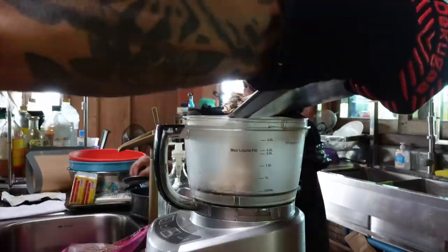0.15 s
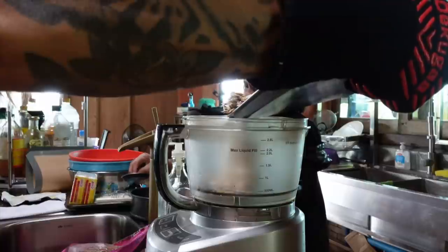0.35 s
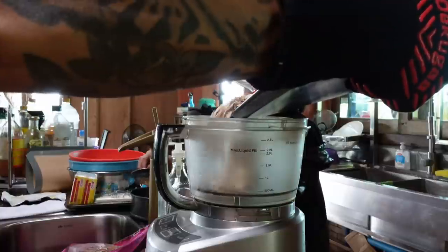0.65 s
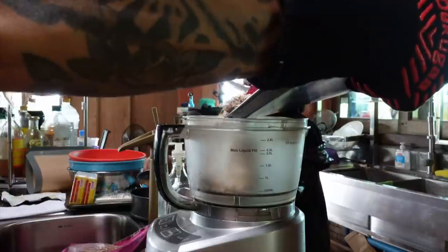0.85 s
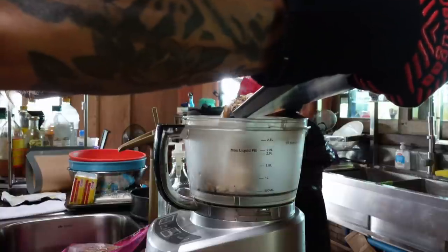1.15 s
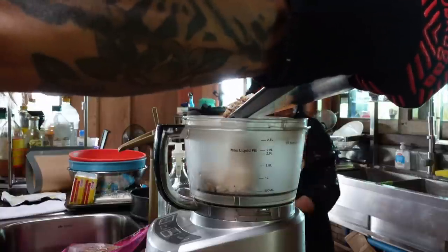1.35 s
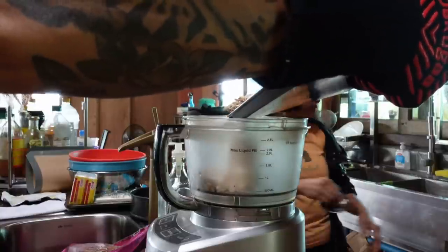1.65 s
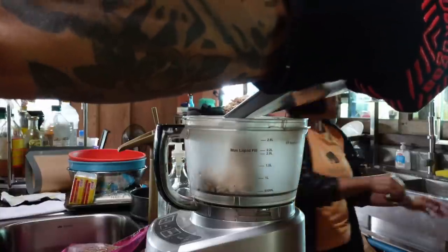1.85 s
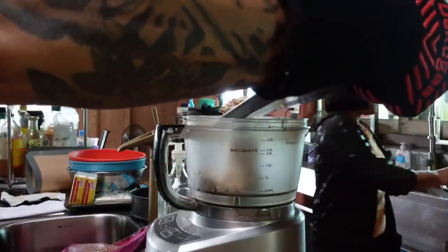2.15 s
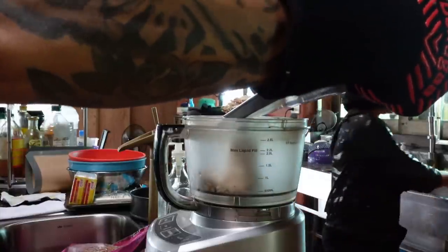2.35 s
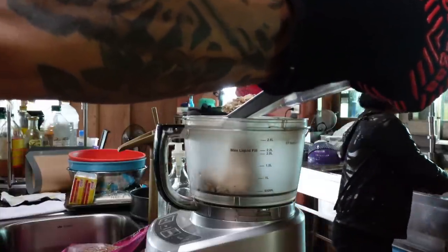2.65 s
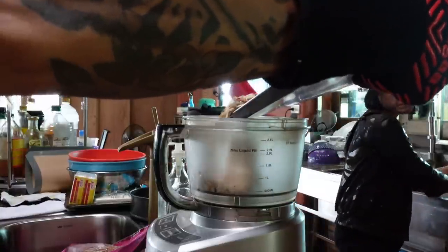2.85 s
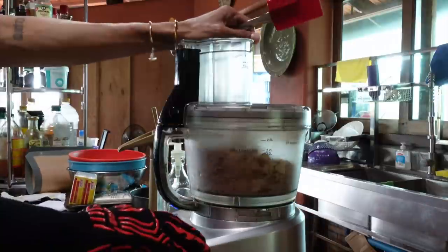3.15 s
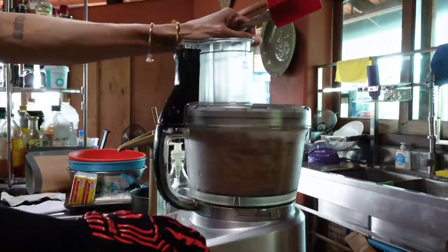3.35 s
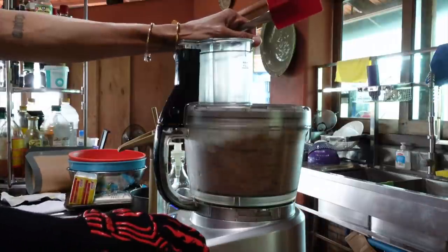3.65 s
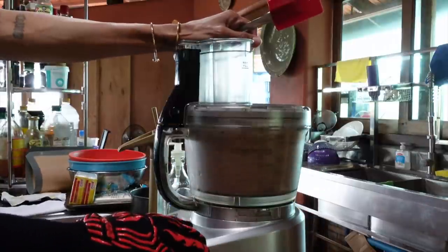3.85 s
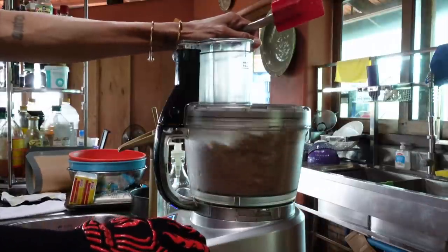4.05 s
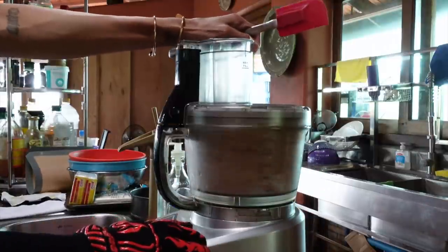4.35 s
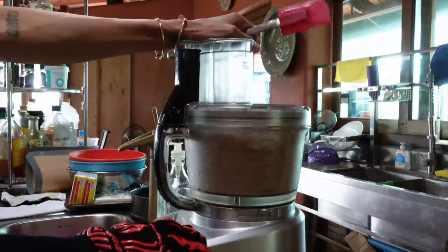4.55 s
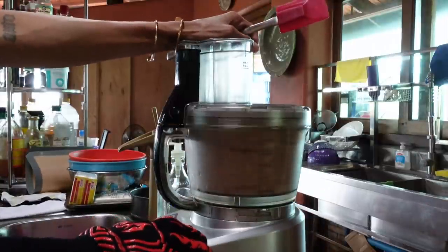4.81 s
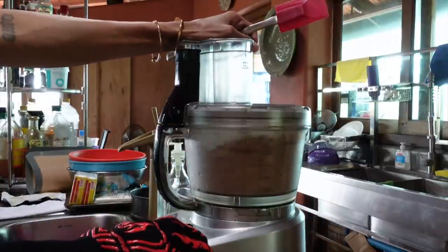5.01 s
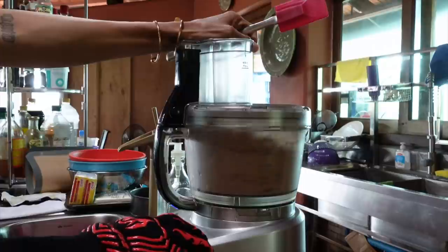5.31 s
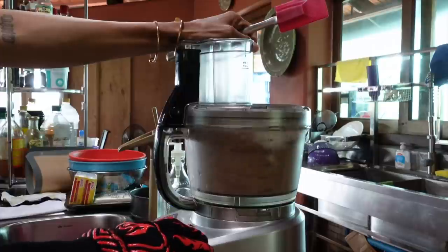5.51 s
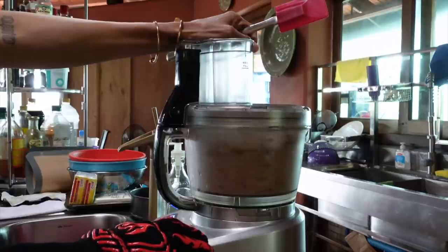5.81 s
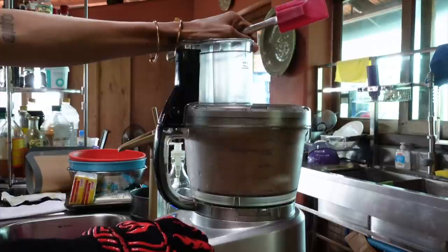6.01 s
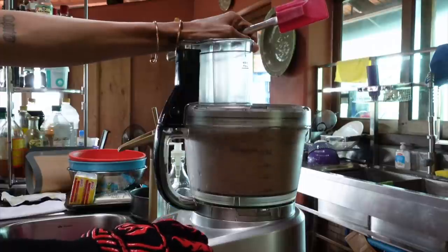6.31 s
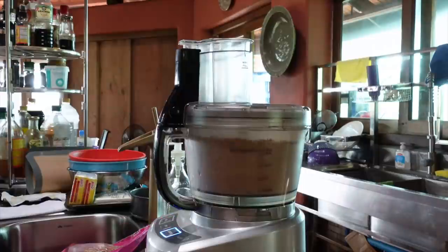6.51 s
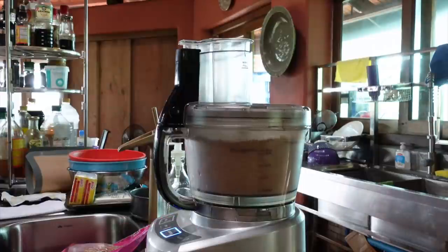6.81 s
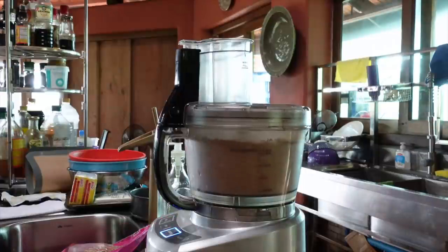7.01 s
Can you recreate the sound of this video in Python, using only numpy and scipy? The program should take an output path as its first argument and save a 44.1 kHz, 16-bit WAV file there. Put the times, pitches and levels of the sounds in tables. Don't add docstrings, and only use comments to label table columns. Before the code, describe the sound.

Close stereo microphones catch a metal tray knocked and ringing in a live kitchen, dry flakes skittering off it, sparse taps, then a gritty spatula stroke. Suddenly a food processor is close by, chopping nuts in six separate bursts, each starting with a hard rattle against the plastic bowl and churning down. Finally it runs continuously, rattling, beating and humming over faint room air.

```python
import sys
import numpy as np
from scipy import signal
from scipy.fft import rfft, irfft
from scipy.io import wavfile
from scipy.ndimage import uniform_filter1d

SR = 44100
rng = np.random.default_rng(int(sys.argv[2]) if len(sys.argv) > 2 else 0)


def digitize_waveform(pressure):
    field = np.atleast_2d(pressure).T
    bounded = np.clip(field, -1, 1)
    quanta = np.round(bounded * 32767).astype(np.int16)
    wavfile.write(sys.argv[1], SR, quanta)


def natural_amplitude(level_db):
    exponent = np.asarray(level_db, float) / 20
    return 10 ** exponent


N = 316197
CONTROL_S = np.arange(N // 44 + 2) * 44 / SR
CUT_S, RUN_S = 3.09, 6.45
SHAFT_HZ, TRAY_HUM_HZ = 29.2, 1180
RATTLE_REF_DB = -26

# freq_hz, density_db (per Hz)
RATTLE_SPECTRUM = [(350, -37), (600, -11.5), (744, -10), (853, -11), (955, -5.5), (1160, 0.5), (1280, -8),
                   (1520, -2.5), (1700, -4), (2210, -1.5), (3510, -5.5), (3980, -8.5), (5110, -6.5),
                   (9000, -28.5), (11700, -49), (19800, -120)]
CRACKLE_SPECTRUM = [(3820, -33), (6500, -4.5), (6970, -0.5), (7470, -3), (10700, -10.5), (14400, -20.5),
                    (15600, -9)]
RUMBLE_SPECTRUM = [(18, -74.5), (30, -49), (81, -29), (108, -13.5), (200, 0), (263, -5.5), (381, 1),
                   (488, -4), (530, -10), (800, -2.5), (1040, -39), (1760, -120)]
# freq_hz, width_hz, level_db
BOWL_LOW = [(871, 57, -2), (800, 70, -12.5)]
BOWL_HIGH = [(1085, 97, 1.5), (1530, 37, -11), (2200, 66, 9), (2530, 82, 3), (3305, 81, 10),
             (4730, 83, -12), (7100, 160, -40)]
# freq_hz, rms_db
SHAFT_ORDERS = [(120, -57), (177, -51), (208, -45), (239.5, -50), (268.5, -52), (479.8, -46), (1187, -45)]
# freq_hz, rms_db
MOTOR_WHINE = [(3190, -46), (4690, -51), (5990, -52), (6840, -53), (11090, -66)]
# time_s, level_db (above 3 kHz)
COARSE = [(3.2, 2.5), (3.8, -2), (4.3, -0.5), (4.9, 1), (5.5, -1), (6.1, 0), (6.8, -0.5)]
# on_s, peak_s, rattle_db, lurch_db
FLINGS = [
    (3.142, 3.239, -23, -45),
    (3.715, 3.777, -25, -54),
    (4.182, 4.275, -21.5, -39),
    (4.747, 4.843, -22, -38),
    (5.307, 5.407, -23, -55),
    (5.906, 5.984, -24, -35),
]
# peak_s, rattle_db, off_s, rumble_db (extra)
CHURNS = [
    (3.409, -27, 3.466, -0.5),
    (3.830, -30.5, 3.94, -0.5),
    (4.401, -27, 4.51, 0),
    (4.985, -25.5, 5.09, -1.5),
    (5.532, -25.5, 5.68, 3),
    (6.070, -26.5, 6.29, -1.5),
]
# time_s, rattle_db, rise_db_per_s, fall_db_per_s
SLAMS = [
    (3.212, -25.5, 3000, 200),
    (4.241, -29, 2000, 250),
    (4.811, -33, 2000, 250),
    (4.917, -31, 1500, 200),
    (5.362, -29.5, 2000, 247.5),
    (5.583, -31, 1500, 213),
    (5.955, -30.5, 2000, 252),
    (6.108, -26, 1500, 140),
]
# time_s, ring_db, rise_db_per_s, fall_db_per_s
JOLTS = [(3.744, -26.5, 1200, 250), (4.219, -28, 897, 202), (4.320, -33, 200, 158.5), (4.699, -52, 150, 61),
         (4.790, -35.5, 700, 150), (4.866, -35.5, 198, 150), (5.344, -38, 898.5, 200),
         (5.420, -26.5, 900, 126), (5.576, -30, 103, 112), (5.889, -47, 152, 65.5), (6.035, -38, 400, 68.5),
         (6.075, -27.5, 147, 500)]
# time_s, base_knock_db, wall_knock_db, wall_pitch_hz
BEATS = [(6.46, -46, -23.5, 990), (6.54, -34, -31, 1000), (6.61, -25, -31, 1130), (6.65, -34, -36, 1120),
         (6.74, -36, -23, 1190), (6.8, -39, -27, 1050), (6.87, -36, -22, 950), (6.91, -24.5, -27, 906),
         (6.98, -24, -38, 980), (7.02, -30.5, -29, 1120), (7.08, -30, -39, 915), (7.16, -42, -23, 1130)]

# peak_s, patter_db, rise_db_per_s, fall_db_per_s
SLIDES = [
    (0.620, -63, 200, 40),
    (0.694, -41, 2997, 501.5),
    (0.750, -45.5, 1500, 100),
    (0.775, -42.5, 400, 81),
    (0.894, -47, 298, 75),
    (1.165, -54, 600, 150),
    (1.212, -47.5, 200, 107),
    (1.330, -61.5, 100, 36),
    (2.260, -63, 300, 247),
    (2.270, -61, 97, 25),
]
# peak_s, level_db, rise_db_per_s, fall_db_per_s
HUMS = [
    (0.648, -59, 600, 500),
    (0.696, -41, 4000, 600),
    (0.762, -40, 600, 150),
    (0.795, -39, 200, 1200),
    (0.892, -52, 500, 250),
    (1.215, -55, 400, 120),
]
# peak_s, level_db, rise_db_per_s, fall_db_per_s
HUM_LINGER = (0.835, -51.5, 900, 28)
# freq_hz, density_db (per Hz)
PATTER_SPECTRUM = [(710, -45), (1200, -3), (1390, -11), (1540, -6), (1730, -20), (1940, -4.5), (3080, -12),
                   (3690, -9), (4070, -12), (10300, -29), (15500, -47)]

# time_s, pressure_db
SCRAPE = [
    (2.63, -103),
    (2.646, -50),
    (2.66, -38.5),
    (2.762, -37),
    (2.822, -46),
    (2.864, -44.5),
    (3.018, -53),
    (3.062, -58.5),
    (3.1, -72),
]
# time_s, grit_db, rise_db_per_s, fall_db_per_s
CRUMBS = [
    (2.66, -41.5, 1800, 190),
    (2.730, -52, 122, 200),
    (2.780, -50, 800, 198),
    (2.890, -50.5, 1500, 46),
    (2.955, -55, 500, 60),
    (3.060, -52.5, 250, 500),
]
# peak_s, level_db, rise_db_per_s, fall_db_per_s
SQUEALS = [
    (2.89, -57, 2000, 60),
    (2.956, -66, 1500, 50),
]
# freq_hz, width_hz, level_db
SQUEAL_MODES = [(3780, 90, 0), (3470, 120, -4), (2480, 110, -6)]
# peak_s, level_db, rise_db_per_s, fall_db_per_s
DUST = (2.975, -69, 250, 30)
# freq_hz, density_db (per Hz)
DRAG_SPECTRUM = [(59, -45), (100, -22.5), (219, -10.5), (404, -9.5), (461, 3.5), (541, -6), (735, 0),
                 (851, -5), (1250, -3), (2070, -8), (2400, -17), (3120, -50), (5280, -120)]
GRIT_SPECTRUM = [(880, -19), (1500, -6), (2090, -2), (3120, -3.5), (3540, -0.5), (4270, -7.5), (9790, -24),
                 (15500, -56)]

# time_s, peak_db, tilt_db_per_octave, ring_db, room_db
BLOWS = [
    (0.071, -44.5, -2.5, -7, -6),
    (0.149, -40, -1, -5, -2.5),
    (0.193, -18, -1, -6, -2.5),
    (0.543, -41.5, 2.5, -17, -8.5),
    (0.693, -50, -2, -26, 2.5),
]
# time_s, peak_db, pitch_hz, tilt_db_per_octave, ring_db
TAPS = [(.693, -50, 1180, -1, 4), (0.693, -40, 2620, -4, 10), (0.072, -49, 2170, -4, 6),
        (1.699, -42, 567, -5, -8), (1.701, -50.5, 1800, -3, 5), (1.7, -43, 1268, -4, -1),
        (1.94, -63.5, 1700, 3, 10), (1.966, -64, 1190, -5, 6), (2.165, -58, 340, -17, -2),
        (2.258, -44, 2200, -6, 7.5), (2.654, -28.5, 1230, -5, -27), (2.886, -48, 3770, -6, 8),
        (2.954, -43.5, 2220, 8, 12)]
# time_s, peak_db, ring_db
CLUNKS = [
    (3.143, -34, -2),
    (3.729, -25.5, -15),
    (3.74, -30.5, 13),
    (4.162, -37, -24),
    (4.189, -28, -30),
    (4.209, -37, 5),
]
# freq_hz, level_db, t60_s
TRAY = [(351, -20.5, 1.1), (534, -11.5, 1.4), (617, -34, 0.32), (658, -17, 1.97), (826, -11.5, 1.2),
        (913, -6, 0.61), (1184, -12, 0.33), (1450, -16, 0.79), (1770, -8.5, 0.2), (2200, -11, 0.2),
        (2220, -22, 0.3), (2670, -11, 0.3), (3170, -17, 0.6), (3320, -10, 0.66), (3500, -27, 0.95),
        (3750, -6, 0.38), (4500, -33, 0.33), (5300, -28, 1), (5150, -12, 0.56), (5766, -37, 0.43)]
RIM = [(1160, -5, 1.5), (1432, -39, 5.0), (1800, -4, 1.6), (2060, -2, 0.43), (2218, 3, 0.43),
       (2630, -13, 0.75), (3149, -3, 0.59), (3300, -13, 0.96), (3360, -12, 5.0), (3618, -9, 0.67),
       (3779, -19, 5.0), (3840, -14, 2.3), (4081, -19, 0.86), (4300, -14, 0.32)]
# freq_hz, density_db (per Hz)
KNOCK_SPECTRUM = [(59, -67.5), (100, -24), (487, -5), (519, -7), (1020, -5), (1760, -2), (2470, -11.5),
                  (3250, -6), (8410, -19), (15500, -43)]
# freq_hz, t60_s
KITCHEN = [(200, 0.89), (600, 0.94), (1500, 0.69), (4000, 0.8), (10000, 0.7)]
# freq_hz, density_db (per Hz)
CLATTER_SPECTRUM = [(47, -43), (80, -5), (385, 3), (428, -3), (611, 0), (1410, -15.5), (1570, -12),
                    (3870, -21), (12000, -50), (15600, -77.5), (22000, -120)]

# freq_hz, density_db (per Hz)
AIR_SPECTRUM = [(15, -53), (25, -21.5), (53, -5), (86, -23), (107, -5.5), (204, -2), (253, -9.5),
                (281, -11.5), (684, -15.5), (2560, -16.5), (3630, -16), (7700, -24), (10100, -34),
                (15500, -55.5)]
# time_s, level_db
AIR_LEVEL = [
    (0, 7.5),
    (3.085, 4),
    (3.1, 10),
    (7.2, 14),
]
# freq_hz, width_hz, level_db
FAN_HISS = [(9800, 760, 7), (3580, 300, 1)]

# freq_hz, side_db (above mid)
PROCESSOR_WIDE = [(60, -39), (110, -46), (200, -61), (380, -22), (700, -20), (1290, -19), (2380, -14),
                  (4400, -18), (8120, -13), (15000, 2.5)]
TRAY_WIDE = [(60, -18), (150, -26), (380, -17.5), (950, -9.5), (2380, -7.5), (5980, -4.5), (15000, -3)]
AIR_WIDE = [(60, -24), (150, -17), (380, -3), (950, -1.5), (2380, -1), (5980, -2), (15000, -3)]
# freq_hz, level_db
PROCESSOR_LEAN = [(60, 0.0), (130, 0.32), (290, -0.2), (640, -0.31), (1410, -0.37), (3100, -1.5),
                  (6820, -2.0), (15000, -1.5)]
TRAY_LEAN = [(60, 3), (180, -1.5), (550, 0), (1650, -2), (4970, -3.5), (15000, -3.5)]


def processor():
    rattle_db, ring_db, rumble_db, crackle_db = chopping()
    t = np.arange(N) / SR
    load = natural_amplitude(0.7 * slow(span=500) + 0.6 * np.cos(2 * np.pi * SHAFT_HZ * t))
    hits = near_echo(load * impacts(3500, spread_db=1.5), wet_db=0.0, t60=0.96)
    thumps = near_echo(load * impacts(900, spread_db=2.5), wet_db=-1.0, t60=0.098)
    modes = sum(natural_amplitude(db + 4.5 * slow(span=2500)) * rung(hits, [(hz, width, 0)]) for hz, width, db in BOWL_HIGH)
    wall = coloured(hits, RATTLE_SPECTRUM) + natural_amplitude(-15) * evened(modes)
    coarse_gain = natural_amplitude(np.interp(t, *np.transpose(COARSE)))
    wall = clumped(wall + (coarse_gain - 1) * filtered(wall, 2, 3000, "high"))
    slots = tone(BOWL_LOW[0][0] + 14 * slow(span=900))
    ring = rung(hits + 1.9 * thumps, BOWL_LOW) + 0.7 * slots
    layers = natural_amplitude(rattle_db) * evened(wall) + natural_amplitude(ring_db) * evened(ring)
    layers += natural_amplitude(rumble_db) * coloured(thumps, RUMBLE_SPECTRUM)
    layers += natural_amplitude(crackle_db) * coloured(hits, CRACKLE_SPECTRUM)
    thud = natural_amplitude(-40.5) * np.exp(-((t - RUN_S) / 0.0025) ** 2)
    return layers + thud + beats() + motor_hum() * (t > RUN_S)


def chopping():
    flings, churns = [], []
    for (on, s, db, _), (churn_s, churn_db, off, _) in zip(FLINGS, CHURNS):
        spin_up = np.clip((CONTROL_S - on) / (s - on), 1e-4, 1)
        flings.append(db + 20 * 1.51 * np.log10(spin_up) - 106 * np.maximum(CONTROL_S - s, 0))
        churn = swell(churn_s, churn_db, rise=62, fall=18.5)
        coast = -67 * np.maximum(CONTROL_S - off, 0)
        onset = np.minimum(900 * (CONTROL_S - on - 0.02), 0)
        churns.append(churn + coast + onset)
    pulses = joined(flings + churns + [swell(*row) for row in SLAMS])
    level = fine(pulses) - RATTLE_REF_DB
    early = fine(pulses, late_s=-0.0053) - RATTLE_REF_DB
    late = fine(pulses, late_s=0.0094) - RATTLE_REF_DB

    jolts = fine(joined(swell(*row) for row in JOLTS))
    ring = joined([-47 + 0.67 * level - 100 * (level < -40), jolts])
    extra = sum(db * (CONTROL_S > s - 0.15) * (CONTROL_S < off + 0.2) for s, _, off, db in CHURNS)
    rumble = -41.5 + 0.78 * np.maximum(level, early) + fine(extra) + slow(span=1200)
    lurches = joined(swell(s + 0.047, db, rise=259, fall=259) for _, s, _, db in FLINGS)
    rumble = joined([rumble, fine(lurches)])
    crackle = -42 + 1.23 * np.minimum(level, late)

    running = np.arange(N) / SR > RUN_S
    surge = 0.7 * slow(span=450)
    return (np.where(running, -26.5 + surge, level + RATTLE_REF_DB),
            np.where(running, -42 + 3.5 * slow(span=500), ring),
            np.where(running, -38, rumble),
            np.where(running, -41 + surge, crackle))


def beats():
    out, t = np.zeros(N + 4000), np.arange(4000) / SR
    s, *columns = np.transpose(BEATS)
    for at in np.arange(6.464, N / SR, 1 / SHAFT_HZ):
        late, a, b, c = rng.standard_normal(4)
        base_db, wall_db, wall_hz = (np.interp(at, s, v) for v in columns)
        base_hz = 385 * (1 + 0.035 * c)
        knock = natural_amplitude(base_db + 1.5 * a - 60 * t / 0.054) * np.sin(2 * np.pi * base_hz * t)
        knock += natural_amplitude(wall_db + 1.5 * b - 60 * t / 0.064) * np.sin(2 * np.pi * wall_hz * t)
        start = round((at + 0.0015 * late) * SR)
        out[start:][:4000] += knock * np.minimum(t / 0.0033, 1)
    return out[:N]


def motor_hum():
    t, hum = np.arange(N) / SR, np.zeros(N)
    for hz, db in SHAFT_ORDERS:
        order = np.sqrt(2) * np.sin(2 * np.pi * (hz * t + rng.random()))
        hum += natural_amplitude(db - 4.0 + 2.3 * slow(span=1500)) * order
    for hz, db in MOTOR_WHINE:
        hum += natural_amplitude(db + 3 * slow(span=1500)) * tone(hz * (1 + 0.003 * slow(span=2000)))
    return hum


def clumped(x):
    z = signal.stft(x, SR, nperseg=256)[2]
    patches = uniform_filter1d(rng.standard_normal(z.T.shape), size=5, axis=0)
    patches = evened(uniform_filter1d(patches, size=4, axis=1)).T
    return signal.istft(z * natural_amplitude(1.5 * patches), SR, nperseg=256)[1][:N]


def blows():
    sheet = TRAY + [(f, level - 11.5, min(t60, 0.3)) for f, level, t60 in RIM]
    out = np.zeros(N)
    for s, db, tilt, ring, room in BLOWS:
        modes = [(f, ring + level + tilt * np.log2(f / 1500), 0.67 * t60) for f, level, t60 in sheet]
        out += strike(s, db, tilt, modes, room)
    spots = [(*row, -12) for row in TAPS]
    spots += [(s, db, 870, 0.5, ring, -11.5) for s, db, ring in CLUNKS]
    for s, db, f, tilt, ring, room in spots:
        modes = [(f, ring, 110 / f), (0.86 * f, ring - 5, 80 / f)]
        out += strike(s, db, tilt, modes, room)
    return filtered(out, 3, 200, "high")


def strike(s, peak_db, tilt_db, modes, room_db):
    t, hz = np.arange(SR) / SR, np.fft.rfftfreq(SR, 1 / SR)
    colour = natural_amplitude(read(KNOCK_SPECTRUM, hz) + tilt_db * np.log2(hz / 1500 + 0.05))
    colour /= np.sqrt(np.mean(colour ** 2))
    crack = irfft(colour * rfft(rng.standard_normal(SR)), SR) * natural_amplitude(-60 * t / 0.048)
    ring = sum(natural_amplitude(db - 60 * t / t60) * np.sin(2 * np.pi * f * t) * rng.choice([-1, 1]) for f, db, t60 in modes)
    peaks = sum(natural_amplitude(db + 22.5) / (1 + ((hz - f) / (13 + 0.26 / t60)) ** 2) for f, db, t60 in modes)
    echo = irfft(colour * (1 + peaks) * rfft(tail(KITCHEN)[:SR]), SR)
    echo *= np.minimum(t / 0.0071, 1) * (t < 0.8) / np.std(echo[:2000])
    out = np.zeros(N + SR)
    sound = crack + ring + natural_amplitude(room_db) * echo
    out[round(s * SR):][:SR] = natural_amplitude(peak_db - 8.5) * sound * np.minimum(t / 0.0001, 1)
    out[round(CUT_S * SR):] *= s > CUT_S
    return out[:N]


def sliding_nuts():
    t = np.arange(N) / SR
    patter_db = fine(joined(swell(*row) for row in SLIDES) - 100 * (CONTROL_S > 2.62))
    hum_db = fine(joined(swell(*row) for row in HUMS))
    beating = 1 + 0.41 * np.cos(2 * np.pi * 18.2 * (t - 0.84))
    linger_db = fine(swell(*HUM_LINGER)) + 2 * slow(span=400) + 20 * np.log10(beating)
    ticks = near_echo(impacts(2500, spread_db=1.0), wet_db=-6.5, t60=0.11)
    ring = rung(ticks, [(hz, 40, db) for hz, db, _ in TRAY if hz > 1.5 * TRAY_HUM_HZ])
    sustained = tone(TRAY_HUM_HZ + 12 * slow(span=700))
    hum = evened(rung(ticks, [(TRAY_HUM_HZ, 45, 0)]) + 0.17 * sustained)
    sheet = natural_amplitude(patter_db) * evened(coloured(ticks, PATTER_SPECTRUM) + natural_amplitude(-10.5) * ring)
    sheet += natural_amplitude(linger_db) * hum + natural_amplitude(hum_db) * evened(0.95 * hum + sustained)
    return filtered(sheet, 5, 950, "high")


def spatula():
    t = np.arange(N) / SR
    drag_db = level_curve(SCRAPE) - 100 * (t > CUT_S)
    grit_db = fine(joined(swell(*row) for row in CRUMBS)) - 2000 * np.maximum(t - CUT_S + 0.0044, 0)
    slips = near_echo(impacts(1500, spread_db=1.5), wet_db=-5.0, t60=0.2)
    grit = near_echo(impacts(2500, spread_db=2.0), wet_db=5, t60=0.079)
    hollow_hz = np.clip(910 - 780 * (t - SCRAPE[0][0]), 300, 1200)
    turn, r = np.exp(2j * np.pi * np.cumsum(hollow_hz) / SR), np.exp(-np.pi * 150 / SR)
    smooth = signal.lfilter([1 - r], [1, -r], slips / turn)
    smooth = signal.lfilter([1 - r], [1, -r], smooth)
    hollow = evened((turn * smooth).real)
    drag = filtered(coloured(slips, DRAG_SPECTRUM), 8, 1680)
    lifted = np.clip((t - 2.872) / 0.0062, 0, 1)
    drag = (1 - 0.5 * lifted) * drag + 1.4 * lifted * filtered(drag, 4, 620)
    squeal = natural_amplitude(fine(joined(swell(*row) for row in SQUEALS))) * rung(grit, SQUEAL_MODES)
    dust = natural_amplitude(fine(swell(*DUST))) * evened(filtered(grit, 4, 7000, "high"))
    scrape = natural_amplitude(drag_db) * (drag + natural_amplitude(-15) * hollow) + natural_amplitude(grit_db) * coloured(grit, GRIT_SPECTRUM)
    return scrape + (squeal + dust) * (t < CUT_S)


def earlier_clatter():
    t = np.arange(N) / SR
    return natural_amplitude(-45 - 98 * t) * (t < 0.16) * coloured(rng.standard_normal(N), CLATTER_SPECTRUM)


def air():
    noise = coloured(rng.standard_normal(N), AIR_SPECTRUM)
    noise += natural_amplitude(-16.0) * rung(rng.standard_normal(N), FAN_HISS)
    return ports(natural_amplitude(-73 + level_curve(AIR_LEVEL)) * noise, AIR_WIDE, TRAY_LEAN)


def ports(x, wide_db, lean_db):
    hz, _, z = signal.stft(x, SR, nperseg=512)
    a, b = rng.standard_normal((2,) + z.shape)
    strength = np.sqrt(uniform_filter1d(abs(z) ** 2, 3, 0) / 2)
    side = natural_amplitude(read(wide_db, hz) + 0.5)[:, None] * strength * (a + 1j * b)
    half = natural_amplitude(read(lean_db, hz) / 2)[:, None]
    pair = np.array([(z + side) * half, (z - side) / half])
    return signal.istft(pair, SR, nperseg=512)[1][:, :N]


def near_echo(x, wet_db, t60):
    r = natural_amplitude(-2 * 60 / (t60 * SR))
    echo = np.sqrt(signal.lfilter([1 - r], [1, -r], x ** 2)) * rng.standard_normal(N)
    return evened(x + natural_amplitude(wet_db) * echo)


def tail(t60):
    hz, t, z = signal.stft(rng.standard_normal(SR), SR, nperseg=256)
    echo = signal.istft(z * natural_amplitude(-60 * t / read(t60, hz)[:, None]), SR, nperseg=256)[1]
    return echo / np.linalg.norm(echo)


def impacts(per_s, spread_db):
    size = natural_amplitude(spread_db * np.minimum(rng.exponential(1, N), 4)) * rng.choice([-1., 1.], N)
    return evened(size * (rng.random(N) < per_s / SR))


def rung(x, modes):
    out = 0
    for k, (hz, width, db) in enumerate(modes):
        r = np.exp(-np.pi * width / SR)
        poles = [1, -2 * r * np.cos(2 * np.pi * hz / SR), r * r]
        out = out + (-1) ** k * natural_amplitude(db) * (1 - r) * signal.lfilter([1, 0, -1], poles, x)
    return evened(out)


def coloured(x, spectrum):
    size = 8192
    hz = abs(np.fft.fftfreq(size, 1 / SR))
    log_gain = np.log(natural_amplitude(np.maximum(read(spectrum, hz), -100)))
    taps = np.fft.ifft(np.exp(np.conj(signal.hilbert(log_gain)))).real[:size // 2]
    return evened(signal.oaconvolve(x, taps)[:N])


def filtered(x, order, hz, kind="low"):
    return signal.sosfilt(signal.butter(order, hz, kind, fs=SR, output="sos"), x)


def tone(hz):
    return np.sqrt(2) * np.sin(2 * np.pi * np.cumsum(hz) / SR)


def evened(x):
    return x / np.sqrt(np.mean(x ** 2) + 1e-20)


def read(points, hz):
    f, value = np.transpose(points)
    return np.interp(np.log(hz + 1), np.log(f + 1), value)


def level_curve(rows):
    s, db = np.transpose(rows)
    out = np.full(N, -150.0)
    at = np.arange(round(s[0] * SR), min(round(s[-1] * SR) + 1500, N))
    out[at] = np.interp(at / SR, s, db)
    return out


def slow(span):
    return evened(uniform_filter1d(uniform_filter1d(rng.standard_normal(N), span), span))


def swell(s, db, rise, fall):
    return db + np.minimum(rise * (CONTROL_S - s), -fall * (CONTROL_S - s))


def joined(levels_db):
    return 10 * np.log10(sum(natural_amplitude(2 * np.asarray(db)) for db in levels_db) + 1e-15)


def fine(control, late_s=0):
    return np.interp(np.arange(N) / SR - late_s, CONTROL_S, control)


def scene():
    tray = blows() + earlier_clatter() + sliding_nuts() + spatula()
    machine = ports(processor(), PROCESSOR_WIDE, PROCESSOR_LEAN)
    return machine + ports(tray, TRAY_WIDE, TRAY_LEAN) + air()


def low_pass(x):
    return signal.sosfilt(signal.butter(12, 15750, fs=SR, output="sos"), x)


def record(dry):
    thin = filtered(dry, 2, 75, "high")
    thin = signal.oaconvolve(thin, signal.firwin(101, 15000, fs=SR)[None], "same")
    mix = 0.59 * np.tanh(thin / 0.61)
    return low_pass(mix)


dry = scene()
out = record(dry)
digitize_waveform(out)
```